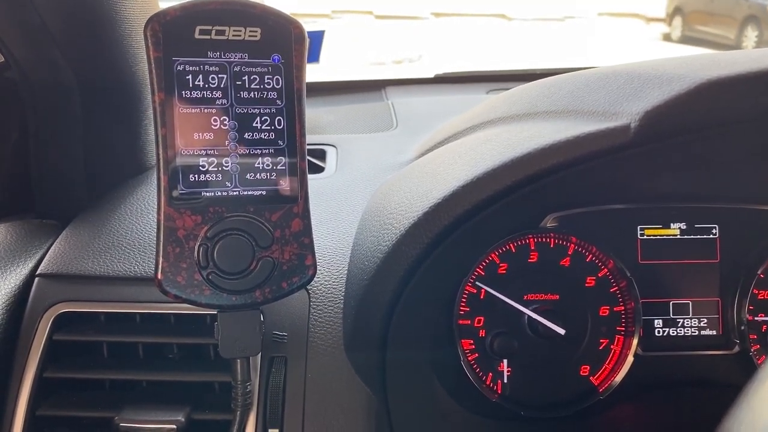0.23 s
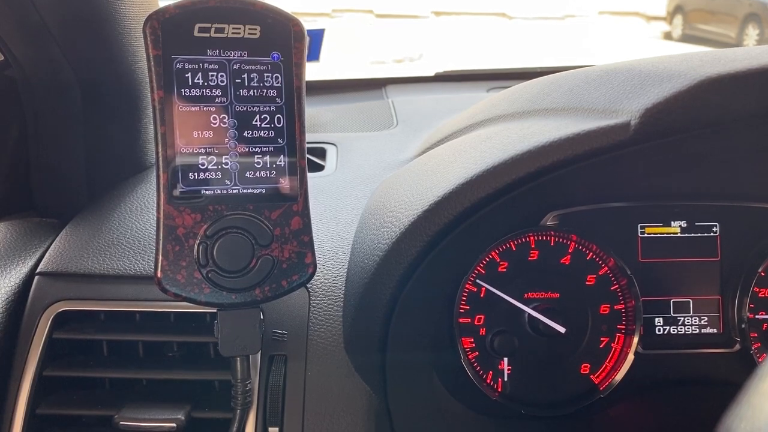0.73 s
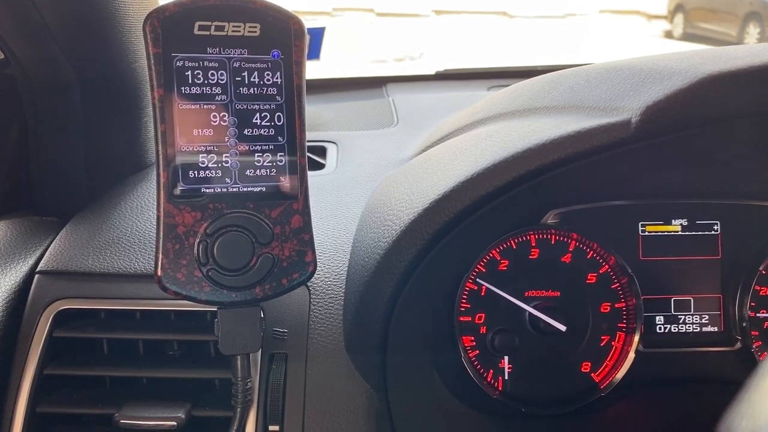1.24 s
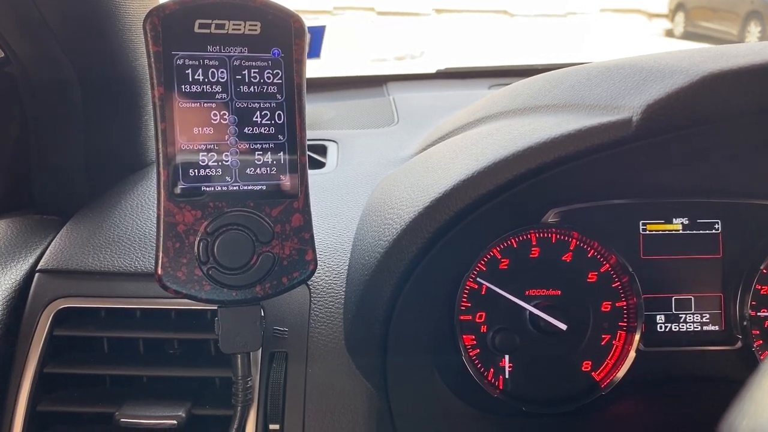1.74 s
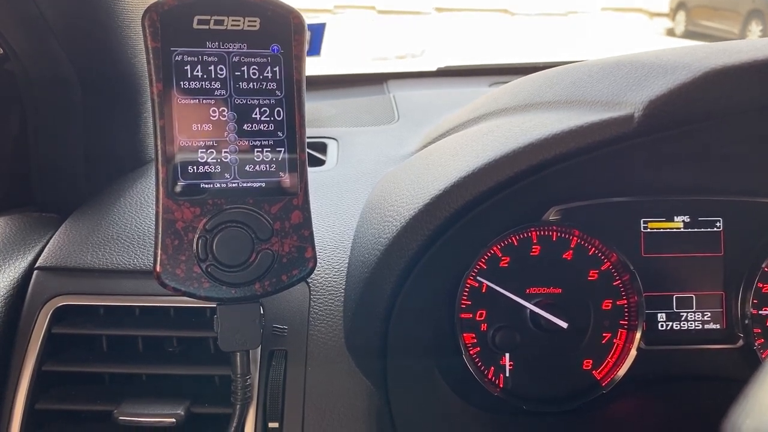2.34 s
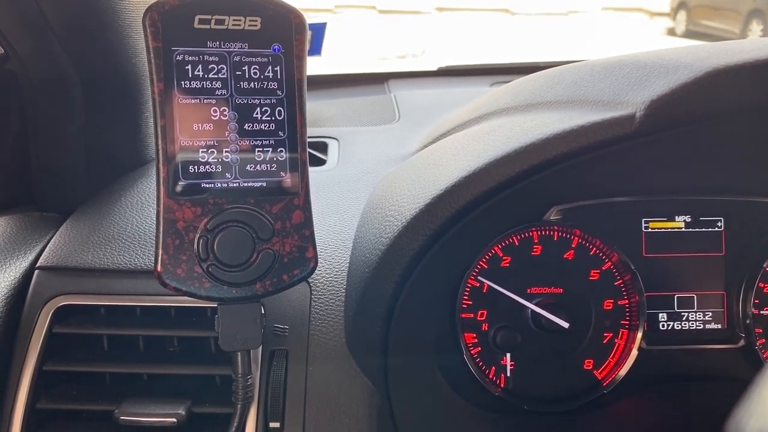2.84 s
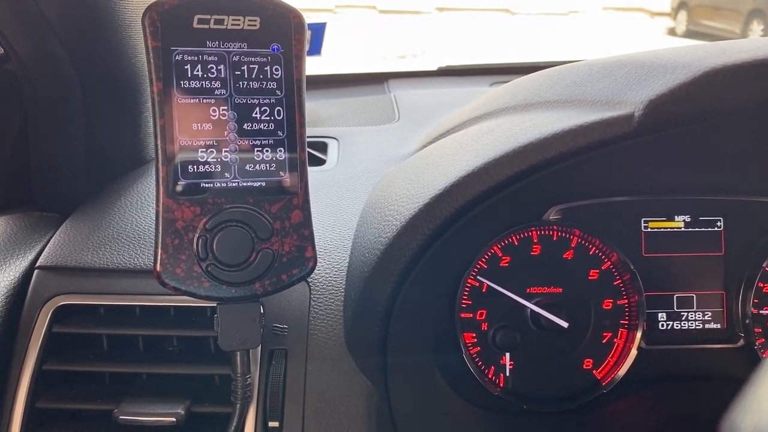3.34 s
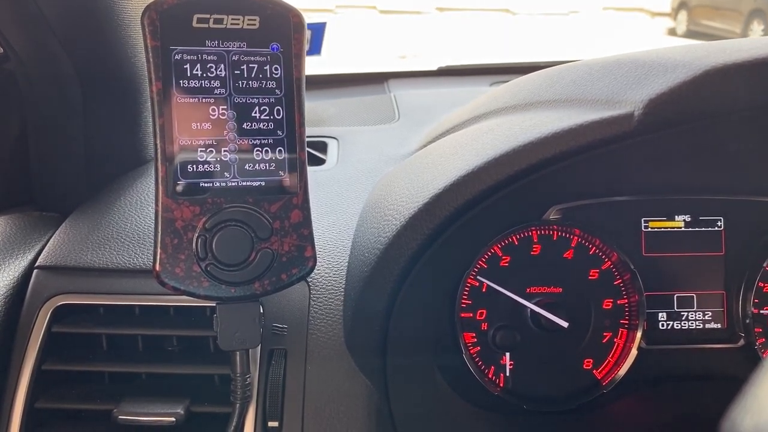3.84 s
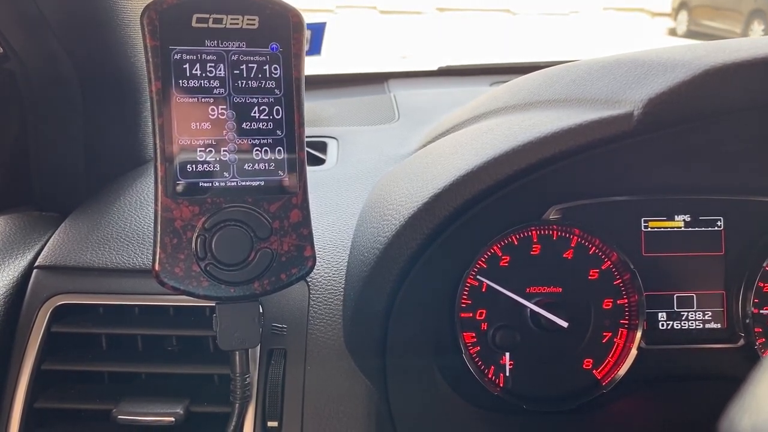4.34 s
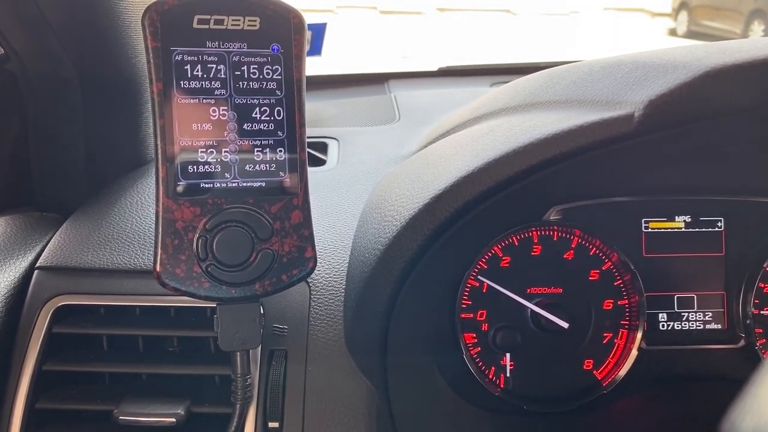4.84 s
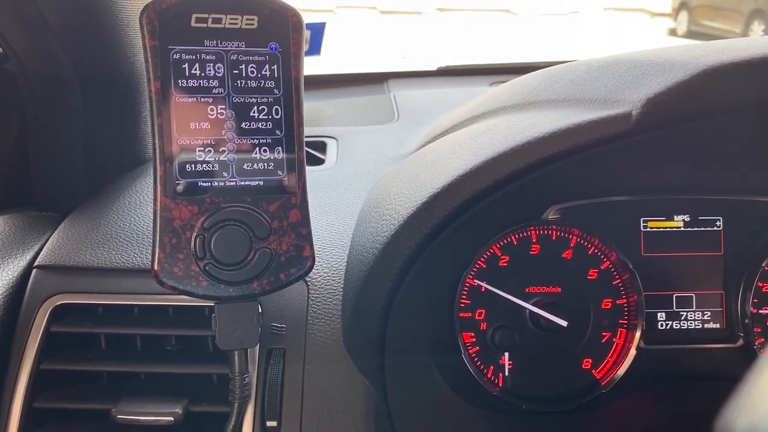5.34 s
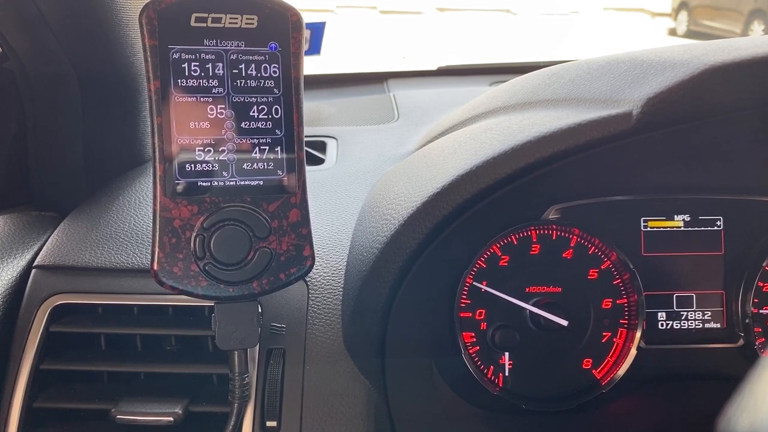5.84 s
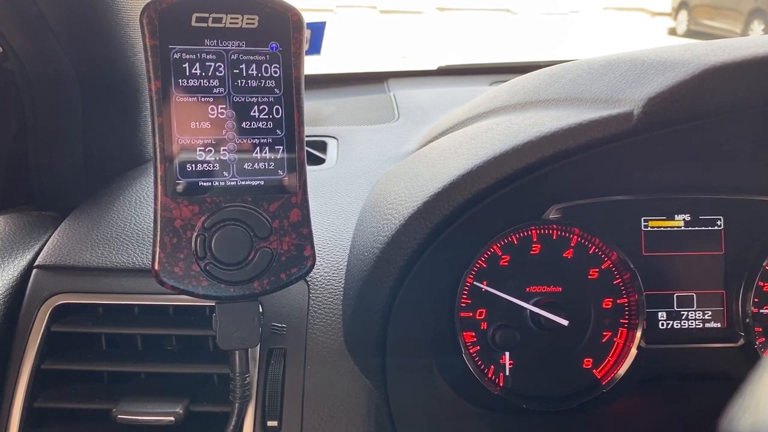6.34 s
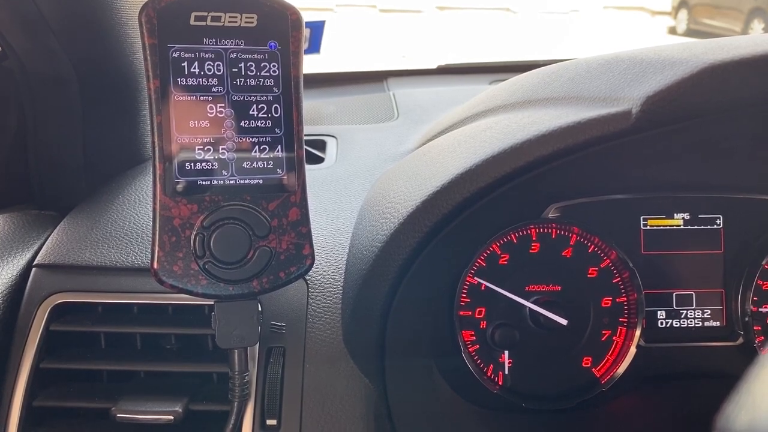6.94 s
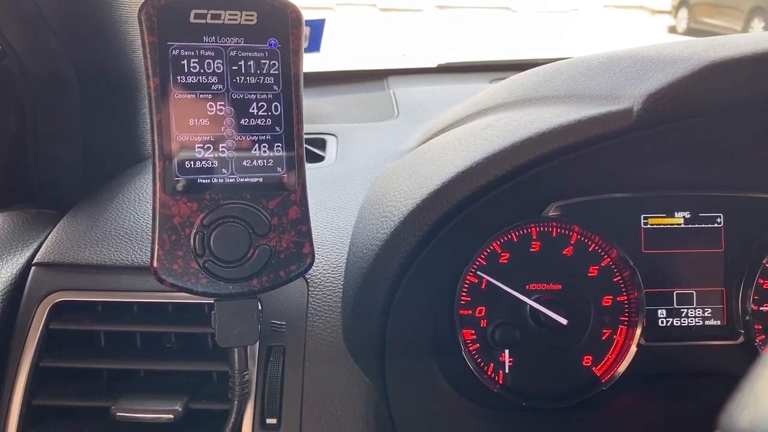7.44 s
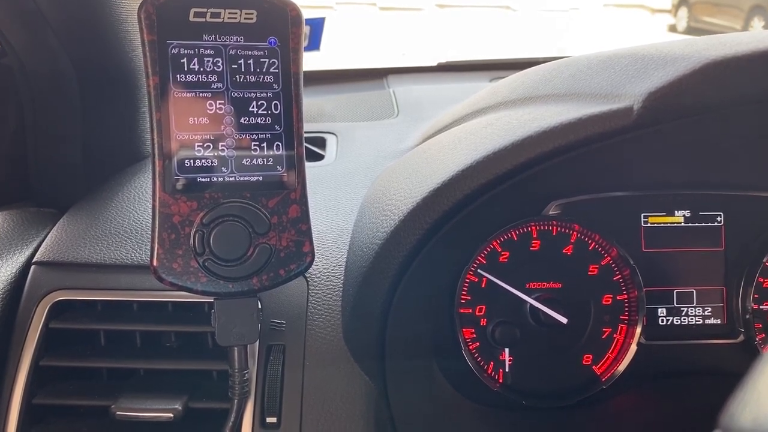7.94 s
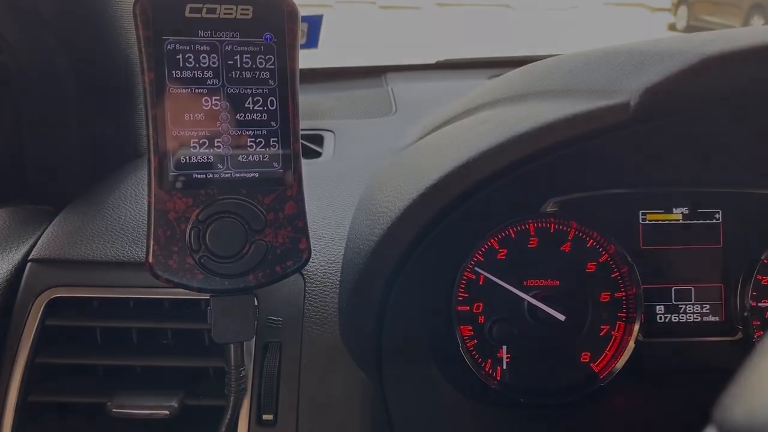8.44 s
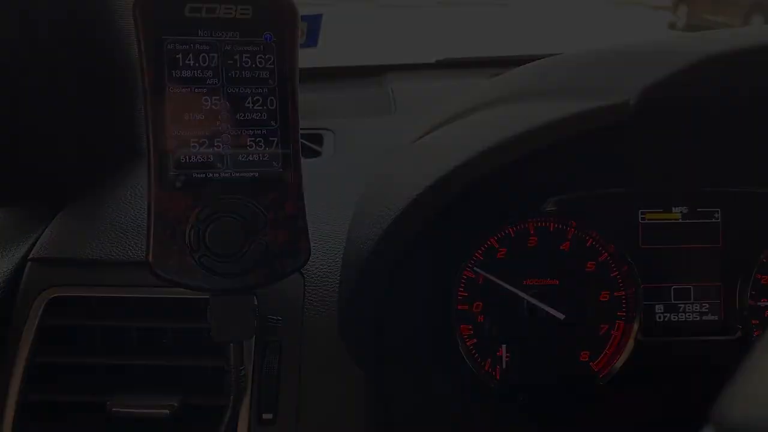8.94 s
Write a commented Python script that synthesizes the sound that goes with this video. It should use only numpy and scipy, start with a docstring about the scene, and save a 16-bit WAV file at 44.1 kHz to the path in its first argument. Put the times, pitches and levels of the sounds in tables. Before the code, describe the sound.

Inside a closed car, the microphone at the driver's seat picks up the low, uneven rumble of an idling engine, with soft clatter, airy hiss and a faint turbo hum. Midway the pitch drops and the idle turns rough and lumpy, shaking a few short buzzes from nearby trim. After about two seconds the engine recovers and drones on. Occasional distant bird chirps barely come through from outside.

```python
"""A turbocharged four-cylinder engine on fast idle, microphone at the driver's seat of a closed car.
Its firing harmonics drone through the cabin, unequal firings make it lope and knocks ring the panels.
Midway the speed sags, the engine stumbles and loose trim buzzes close by. From behind the dashboard
come valve clatter, rustling air and the turbo's hum, with a few thin whines.
Outside, well off the microphone, a bird chirps faintly."""
import sys
import numpy as np
from scipy import signal
from scipy.fft import rfft, irfft
from scipy.io import wavfile
from scipy.ndimage import uniform_filter1d

SR = 44100
rng = np.random.default_rng(int(sys.argv[2]) if len(sys.argv) > 2 else 0)


def wav_out(sig):
    """Save sig, one row per channel (or a flat mono array), as 16-bit PCM at SR to the path in sys.argv[1]."""
    wavfile.write(sys.argv[1], SR, np.round(np.clip(np.atleast_2d(sig).T, -1, 1) * 32767).astype(np.int16))


N = 405279
TIME = np.arange(N) / SR
BIN_HZ = np.maximum(np.fft.rfftfreq(N, 1 / SR), 1)
IDLE_RPM, LABOUR_ONSET_RPM, FULL_LABOUR_RPM = 1179.4, 1151, 1095

# The engine's speed. Each row: time in seconds, crank speed in rpm.
CRANK_SPEED = [(0.0, 1201.2), (0.3, 1232.8), (0.62, 1206.7), (1.43, 1174.0), (1.92, 1176.7), (2.22, 1146.1),
               (2.74, 1170.1), (3.28, 1147.9), (3.79, 1154.7), (4.51, 1195.6), (4.91, 1160.9),
               (5.45, 972.7), (6.17, 1001.7), (6.73, 1056.8), (7.0, 1148.7), (7.47, 1242.8), (8.72, 1171.8),
               (9.19, 1156.9)]
# Cabin booms and nulls at the microphone. Each row: frequency in Hz, a harmonic's base level in dB.
SEAT_RESPONSE = [(32, -46.5), (36, -34.5), (38.3, -35.5), (39.3, -41.5), (40.3, -34), (41.5, -34),
                 (64, -19), (70, -17), (76.5, -21.7), (79.5, -20.4), (83, -27.5), (96, -30.5),
                 (118.5, -31.5), (122.5, -26), (131, -26.5), (146, -39), (152, -23.5), (155, -23.5),
                 (159.3, -37), (164, -31.5), (170, -23.5), (183, -44), (191.5, -47.5), (195, -39),
                 (207, -37)]
# Each entry: gain in dB at full effort, for firing harmonics 1 to 5.
HARMONIC_EFFORT_DB = [-1, 2, 5, 2, 2.5]
# Weak firings. Each row: centre in seconds, depth from 0 to 1, half length in seconds.
STUMBLES = [(5.077, 0.9, 0.011), (5.18, 0.72, 0.01), (5.288, 0.59, 0.017), (5.515, 0.9, 0.034),
            (5.63, 0.96, 0.012), (5.76, 0.54, 0.0176), (5.878, 0.6, 0.024), (5.999, 0.77, 0.0081),
            (6.13, 0.72, 0.048), (6.226, 0.64, 0.0066), (6.288, 0.52, 0.0081), (6.51, 0.37, 0.038),
            (6.625, 0.54, 0.013), (6.95, 0.3, 0.0069), (7.133, 0.3, 0.007)]
# Each entry: one cylinder's relative surplus or lack of push, in firing order.
CYLINDER_IMBALANCE = [.52, -.02, -.3, -.2]

# Resonances around the seat. Each row: frequency in Hz, width in Hz, relative gain in dB.
BOOM_MODES = [(55.2, 13.4, 1.5), (66.1, 18, 2), (94, 26, -18), (127.2, 15, -5.5), (161.3, 25, -5.5),
              (170.9, 7.2, 0.5), (232.3, 3.9, -11)]  # exhaust and cabin air
LARGE_PANEL_MODES = [(234, 5.3, 9), (278.3, 5.5, 0), (308.8, 11, -1), (348.5, 10, 3.5), (361.2, 12.3, 0),
                     (400.4, 8.3, 4)]  # body panels that move in step
SMALL_PANEL_MODES = [(460, 8, -7), (501.5, 3.2, -2), (537, 13, -8.5), (587, 11, -7.5), (661, 43, -8.5),
                     (860, 46, -16.5)]  # smaller, stiffer panels
BULKHEAD_MODES = [(277.3, 17, 1.5), (364, 23, -0.5), (405.2, 16, 0), (464, 12, -4.5), (495, 21, -2),
                  (541.4, 45, -4), (572, 35, 0.5), (648, 45, -2.5), (701, 19, -2), (808, 56, -6),
                  (863, 24, -4.5), (909, 21, -6.5), (999, 17.7, -3.5), (1052, 40, -14), (1218, 41, -17.5),
                  (1305, 20, -10), (1459, 32, -18.5), (1585, 40, -13), (1680, 26, -11), (1770, 31, -13.5),
                  (1947, 32, -14.5), (2200, 69, -20)]  # bulkhead and dashboard
TRIM_MODES = [(566, 74, -3.5), (860, 140, -4), (986, 39, 4.5), (1680, 340, -17.5), (2700, 590, -26)]  # loose plastic

# How the layers follow the engine.
# Each holds: dB at idle, dB per rpm, dB added at full labour, dB added at full effort.
LOPE_GAIN_LAW = (4, 0.0222, 10.5, -1.5)
KNOCK_LAW = (-39, 0, -10, 2.5)
CLATTER_LAW = (-44, 0.0295, 5.5, -0.7)
RUSTLE_LAW = (-48, 0.0112, 0.5, 0.1)

# Bouts of harder valve clatter. Each row: centre in seconds, half length in seconds, boost in dB.
CLATTER_BOUTS = [(0.096, 0.71, 2), (2.3, .25, 1.5), (5.172, 0.038, 2.5), (7.1, .25, 3)]
# Belts, intake and air as they reach the seat. Each row: frequency in Hz, relative level in dB.
RUSTLE_SPECTRUM = [(300, 9.5), (750, 9.5), (1100, 8.5), (1400, 6), (1750, 4.5), (2050, -0.3), (2400, 2),
                   (3000, 0), (4000, -2.3), (5400, -6), (6600, -15), (8000, -16.5), (11800, -22.5),
                   (15700, -17)]
# Trim shaken during the stumbles. Each row: start in seconds, length in seconds, gain in dB.
TRIM_BUZZES = [(5.04, 0.046, -42), (5.147, 0.079, -44), (5.269, 0.044, -37), (5.419, 0.016, -41),
               (5.753, 0.039, -38.5)]
# Thin background tones. Each row: frequency in Hz, rms level in dB.
WHINES = [(1002, -61), (1744, -62.5), (2842, -85.5), (5534, -78), (6094, -93.5), (10013, -81.5)]
# The notes of each bird call. Each row: delay and length in seconds, start and end in Hz, gain in dB.
BIRD_NOTES = {"falling": [(0, 0.05, 4400, 4270, -2), (.045, .04, 4370, 4480, -10.5),
              (.07, .065, 3820, 2960, -7)], "rising": [(0, .065, 4180, 4750, -0.5)],
              "high": [(0, 0.073, 5300, 5250, -0.5)], "peep": [(0.0031, 0.03, 6220, 6150, 1)]}
# The bird outside. Each row: start in seconds, name of the call, gain in dB.
BIRD_CALLS = [(.403, "falling", -50), (1.44, "rising", -64), (2.005, "falling", -51.5), (2.18, "high", -60),
              (2.24, "rising", -63), (3.25, "rising", -63), (3.26, "peep", -66), (4.628, "high", -60.5),
              (6.095, "rising", -60), (6.128, "peep", -62), (6.16, "rising", -63), (6.77, "high", -61),
              (6.835, "rising", -62), (6.97, "high", -60), (7.155, "falling", -51), (7.68, "rising", -63),
              (8.57, "rising", -62)]


def engine_drone(firings, rpm, effort, lag_firings=0.14, dispersion_rad=1.017):
    """The lowest firing harmonics slide through the booms and nulls at the driver's seat."""
    losses = [depth * np.exp(-((TIME - centre) / half) ** 2) for centre, depth, half in STUMBLES]
    strength = np.prod(1 - np.array(losses), axis=0)
    # the firings around a weak one make up for it
    dip = strength / uniform_filter1d(strength, size=SR // 8) - 1
    firing_hz = 2 * rpm / 60
    seat_hz, seat_db = np.transpose(sorted(SEAT_RESPONSE))
    drone = 0
    for k, effort_db in enumerate(HARMONIC_EFFORT_DB, 1):
        db = np.interp(k * firing_hz, seat_hz, seat_db) + effort_db * effort
        wobble = 1 + .02 * k * drift(12)
        stumble = 1 + dip * (1 if k == 2 else .3)  # the booming second harmonic collapses most
        # the body delays each harmonic differently, which rounds the pulses
        angle = 2 * np.pi * k * (firings - lag_firings) - dispersion_rad * (k - 2) ** 2
        drone -= np.sqrt(2) * undb(db) * wobble * stumble * np.cos(angle)
    return drone


def exhaust_lope(firings, gain_db, lag_firings=0.297, erratic_growth=1.26):
    """Cylinders differ and no two firings are alike: each surplus thumps the exhaust and cabin air."""
    phase = firings - lag_firings
    regular = ring(clicks(phase, np.resize(CYLINDER_IMBALANCE, N)), BOOM_MODES)
    erratic = ring(clicks(phase, rng.uniform(-1.16, 1, size=1000)), BOOM_MODES)
    # as the engine labours, the erratic share grows fastest
    return level(regular, db=-39.5 + gain_db) + level(erratic, db=-42 + erratic_growth * gain_db)


def panel_knock(firings, db, weak_knock=0.22):
    """A strong and a weak knock each firing ring the body panels around the microphone."""
    scatter = 1 + .08 * rng.standard_normal(1000)
    knocks = clicks(2 * firings, np.resize([1, weak_knock], len(scatter)) * scatter)
    return level(ring(knocks, LARGE_PANEL_MODES, alternate=False) + ring(knocks, SMALL_PANEL_MODES), db)


def valve_clatter(firings, db, throb=0.18):
    """Valve gear clatters, swelling with each firing, heard through the bulkhead and dashboard."""
    beat = 1 + throb * np.cos(2 * np.pi * firings)
    clatter = rng.standard_normal(N) * beat * undb(.5 * drift(16))
    bouts_db = sum(boost * np.exp(-((TIME - centre) / half) ** 2) for centre, half, boost in CLATTER_BOUTS)
    return level(ring(clatter, BULKHEAD_MODES), db + bouts_db)


def air_rustle(firings, db, throb=0.018):
    """Belts and moving air rustle smoothly behind the dashboard, coloured by the cabin."""
    beat = 1 + throb * np.cos(2 * np.pi * firings)
    air = rng.standard_normal(N) * beat * undb(.5 * drift(31))
    rustle = colour(air, RUSTLE_SPECTRUM)
    return level(reflect(rustle, decay_s=0.025, db=-11), db)


def turbo_hum(rpm, idle_hz=598, hz_per_rpm=1.8, slowest_hz=540, inertia_s=.33, waver_hz=7, flutter=0.41):
    """The turbine follows the engine late and hums unsteadily at its spin rate, louder when driven."""
    pole = np.exp(-1 / (inertia_s * SR))
    start_surplus = rpm[:SR].mean() - IDLE_RPM
    surplus_rpm, _ = signal.lfilter([1 - pole], [1, -pole], rpm - IDLE_RPM, zi=[start_surplus])
    hz = np.maximum(idle_hz + hz_per_rpm * surplus_rpm, slowest_hz)
    hum = (1 + flutter * drift(25)) * tone(hz + waver_hz * drift(20))
    return level(hum, db=-49 + 0.0193 * surplus_rpm)


def trim_buzz(decay_s=0.0063, chatter_hz=66):
    """Loose plastic near the microphone chatters at about twice the sagging firing rate."""
    shake = np.zeros(N)
    for start, length, db in TRIM_BUZZES:
        shaking = (TIME > start) & (TIME < start + length)
        since_tap = (TIME - start) % (1 / chatter_hz)
        shake += 2 * undb(db) * shaking * np.exp(-since_tap / decay_s)
    buzz = ring(shake * rng.standard_normal(N), TRIM_MODES)
    resonance_gain = np.std(ring(rng.standard_normal(N), TRIM_MODES))
    return buzz / resonance_gain


def whines(waver_hz=7):
    """Faint thin tones behind the engine waver quickly in pitch and strength."""
    tones = 0
    for hz, db in WHINES:
        strength = 1 + .3 * drift(15)
        tones += level(strength * tone(hz + waver_hz * drift(25)), db)
    return tones


def bird(rasp=0.041):
    """A bird outside sings short raspy glides, smeared by reflections on their way into the car."""
    song, waver = np.zeros(N), drift(230)
    for start, call, call_db in BIRD_CALLS:
        for delay, length, start_hz, end_hz, note_db in BIRD_NOTES[call]:
            note = np.flatnonzero((TIME >= start + delay) & (TIME < start + delay + length))
            progress = np.linspace(0, 1, len(note))
            glide_hz = start_hz + (end_hz - start_hz) * progress
            swell = np.sqrt(2 * np.abs(np.sin(np.pi * progress)))
            song[note] += undb(call_db + note_db) * swell * tone(glide_hz * (1 + rasp * waver[note]))
    return reflect(song, decay_s=0.057, db=-2.5)


def running_db(law, rpm, effort):
    """A layer's dB from the engine's speed, how badly it labours and how hard it pushes."""
    idle_db, db_per_rpm, labour_db, effort_db = law
    labour = np.clip((LABOUR_ONSET_RPM - rpm) / (LABOUR_ONSET_RPM - FULL_LABOUR_RPM), 0, 1)
    return idle_db + db_per_rpm * (rpm - IDLE_RPM) + labour_db * labour + effort_db * effort


def ring(x, modes, alternate=True):
    """Parallel resonances; alternating polarity fills the valleys between them, equal leaves nulls."""
    response = 0
    for k, (hz, width, db) in enumerate(modes):
        polarity = -1 if alternate and k % 2 else 1
        response += polarity * undb(db) / (1 + 1j * (BIN_HZ / hz - hz / BIN_HZ) * hz / width)
    low_cut = 1 + (.75 * modes[0][0] / BIN_HZ) ** 8
    high_cut = 1 + (BIN_HZ / (1.2 * modes[-1][0])) ** 6
    return irfft(rfft(x) * response / (low_cut * high_cut), N)


def colour(x, spectrum):
    """Filter by a spectrum of (Hz, dB) points, falling off below the first."""
    hz, db = np.transpose(spectrum)
    gain = undb(np.interp(np.log(BIN_HZ), np.log(hz), db))
    return irfft(rfft(x) * gain / (1 + (hz[0] / BIN_HZ) ** 2), N)


def reflect(x, decay_s, db):
    """The direct sound plus a dense, quickly fading tail of reflections."""
    tail = rng.standard_normal(SR // 2) * np.exp(-TIME[:SR // 2] / decay_s)
    return x + undb(db) * signal.fftconvolve(x, tail / np.linalg.norm(tail))[:N]


def clicks(phase, sizes):
    """One click at each whole step of the phase."""
    steps = np.flatnonzero(np.diff(np.floor(phase)) > 0)
    train = np.zeros(N)
    train[steps] = sizes[:len(steps)]
    return train


def tone(hz):
    """A sine that follows a moving pitch."""
    return np.sin(2 * np.pi * np.cumsum(hz) / SR)


def drift(rate_hz):
    """Smooth random motion with rms 1, up to about the given rate."""
    return level(irfft(rfft(rng.standard_normal(N)) / (1 + (BIN_HZ / rate_hz) ** 4), N), db=0)


def level(x, db):
    """Scale to rms 1, then apply a steady or moving gain in dB."""
    return x * undb(db) / np.sqrt(np.mean(x ** 2))


def undb(db):
    """Decibels to gain."""
    return 10 ** (np.asarray(db) / 20)


def scene(full_effort_rpm_per_s=520, effort_smooth_s=.25):
    """The mono mix at the driver's seat: the engine in front, whines and bird far behind it."""
    rpm = np.interp(TIME, *np.transpose(CRANK_SPEED))
    # the engine pushes while it gains speed and coasts while it loses it
    rpm_per_s = uniform_filter1d(np.gradient(rpm, TIME), size=int(effort_smooth_s * SR))
    effort = rpm_per_s / full_effort_rpm_per_s
    firings = 2 * np.cumsum(rpm / 60) / SR  # running count, two per crank turn
    engine = (engine_drone(firings, rpm, effort)
              + exhaust_lope(firings, running_db(LOPE_GAIN_LAW, rpm, effort))
              + panel_knock(firings, running_db(KNOCK_LAW, rpm, effort))
              + valve_clatter(firings, running_db(CLATTER_LAW, rpm, effort))
              + air_rustle(firings, running_db(RUSTLE_LAW, rpm, effort)))
    return (engine + turbo_hum(rpm) + trim_buzz() + whines() + bird())[None]


def record(dry, top_hz=15780, fade_s=.004):
    """The phone at the seat starts and stops softly and cuts the top treble."""
    ramp = np.clip(np.minimum(TIME, TIME[-1] - TIME) / fade_s, 0, 1)
    lowpass = signal.ellip(10, .2, 80, top_hz, fs=SR, output="sos")
    return signal.sosfilt(lowpass, dry * np.sin(ramp * np.pi / 2) ** 2)


dry = scene()
out = record(dry)
wav_out(out)
```